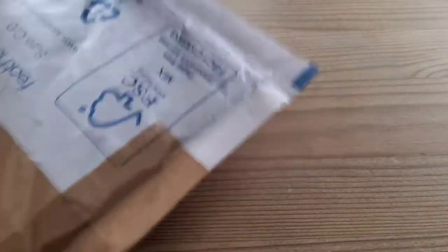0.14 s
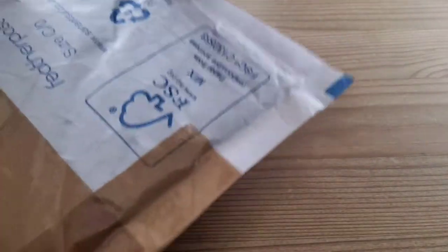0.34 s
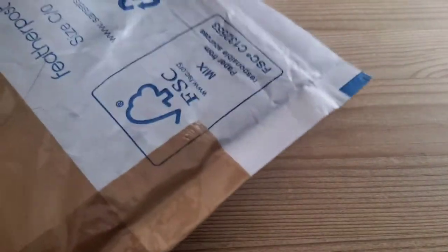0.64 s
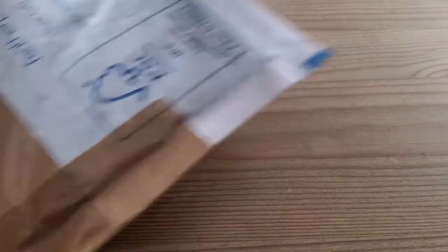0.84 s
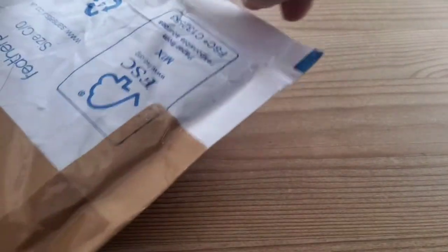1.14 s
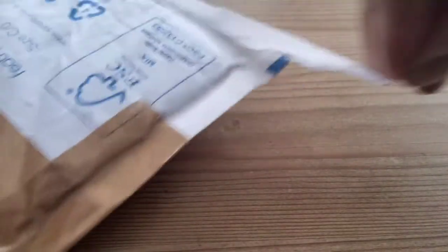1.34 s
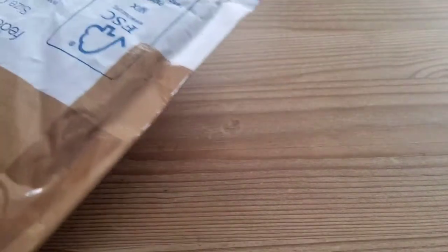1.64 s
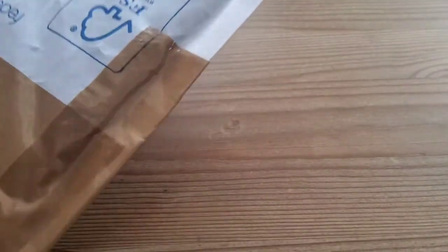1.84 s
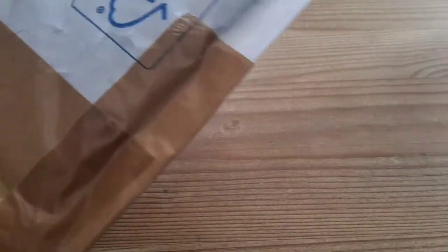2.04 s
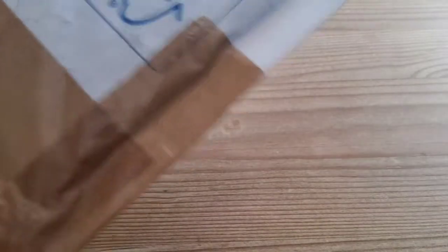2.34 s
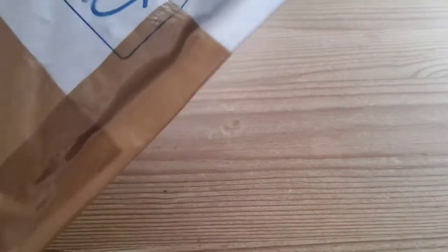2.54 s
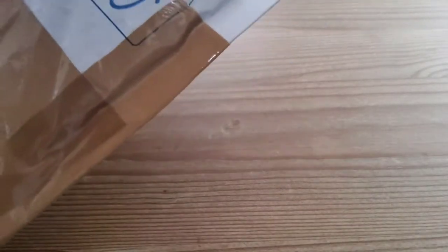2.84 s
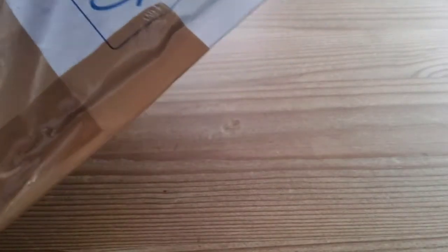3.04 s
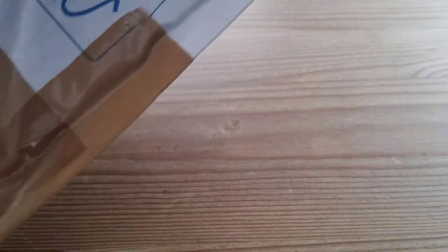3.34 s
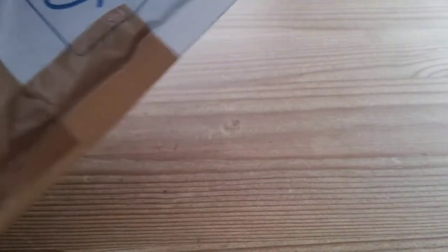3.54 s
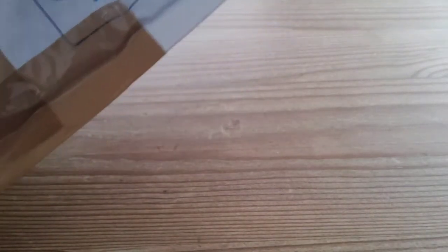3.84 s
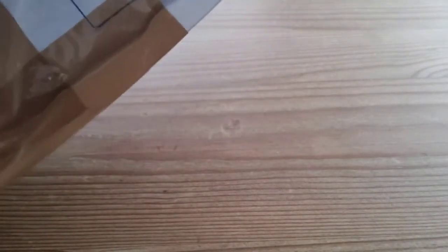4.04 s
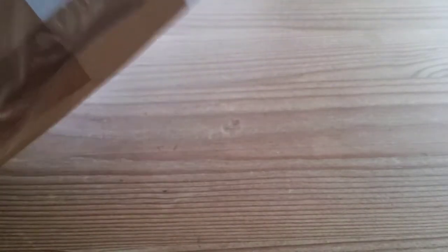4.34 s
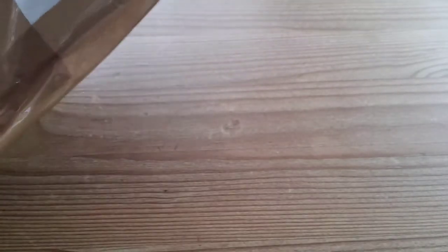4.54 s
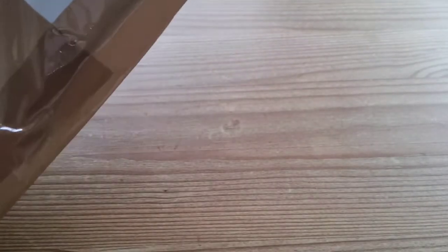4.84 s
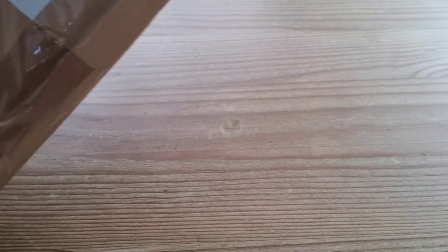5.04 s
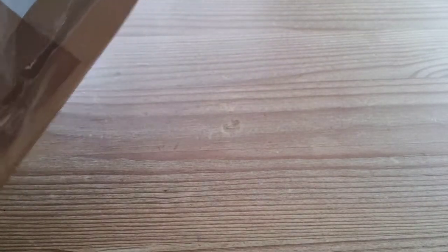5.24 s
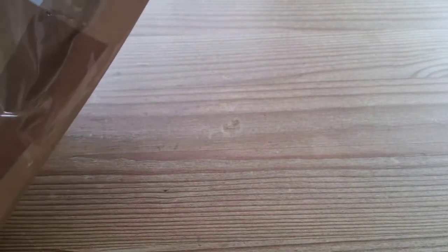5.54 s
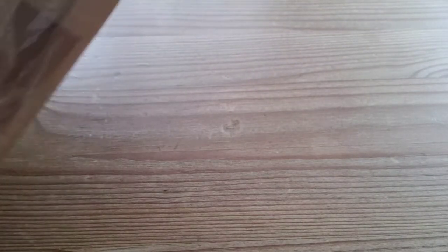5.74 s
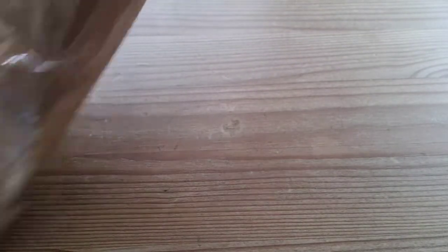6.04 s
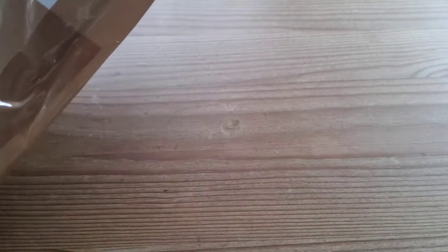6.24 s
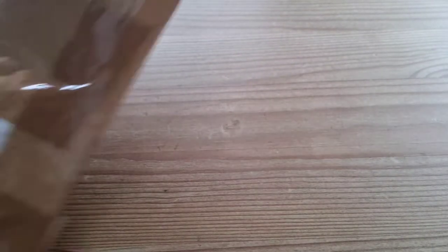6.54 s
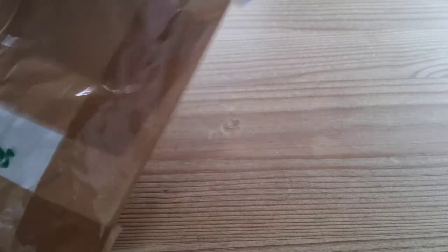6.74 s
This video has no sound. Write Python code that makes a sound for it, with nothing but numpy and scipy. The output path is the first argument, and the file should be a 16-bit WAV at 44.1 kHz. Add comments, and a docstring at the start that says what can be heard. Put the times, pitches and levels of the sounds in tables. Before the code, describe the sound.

A taped paper mailer crinkles and rips close up over a wooden table, with sharp creasing pops, light rubbing and soft bag thumps.

```python
"""A padded, taped paper mailer is gripped, rubbed and torn over a wooden table, close to a phone in a small room.
Hard pulls swell and give way between light slides of the fingers; each is a shower of tiny random slips
that hiss in the fibres and drum on the resonant panels of the bag, while the whole bag flutters.
Creases snap as short pitched pops with cracks of noise, the tape ticks in sprays of treble, the bag thumps
as damped low sines and a grip creaks as narrow ringing noise; faint rumble and hiss lie behind."""
import sys
import numpy as np
from scipy import signal
from scipy.fft import rfft, irfft
from scipy.io import wavfile
from scipy.ndimage import map_coordinates

SR = 44100
rng = np.random.default_rng(int(sys.argv[2]) if len(sys.argv) > 2 else 0)


def to_wav(s):
    """Save 16-bit WAV."""
    ch = np.atleast_2d(s).T  # columns
    pcm = np.round(np.clip(ch, -1, 1) * 32767)  # PCM
    wavfile.write(sys.argv[1], SR, pcm.astype(np.int16))


N = 303849

# All table levels are relative: each layer has its own trim.
# creases buckling: [t/s, pop level/dB, pop f/Hz, crack level/dB]
SNAPS = [(0.0816, -20.5, 1199, -41), (0.31, -28.5, 1540, -32.5), (0.8221, -29, 1140, -28),
         (1.2525, -23, 930, -17), (1.4784, -22, 1140, -23), (1.8523, -36.5, 970, -28.5),
         (2.2562, -32, 1060, -41), (2.3881, -15.5, 840, -29.5), (2.6115, -30, 1005, -39),
         (2.6664, -32, 2300, -39), (2.902, -29.5, 876, -34), (2.9087, -23, 1260, -34),
         (3.006, -21.5, 1350, -24), (3.0189, -17.5, 2620, -34), (3.0854, -21.5, 920, -29),
         (3.4132, -25, 1110, -28), (3.4702, -21.5, 1610, -48), (3.598, -22.5, 740, -42),
         (3.6237, -23, 1910, -51), (3.659, -23.5, 755, -46), (3.735, -25, 1470, -28.5),
         (3.8464, -28.5, 990, -34), (3.8648, -24, 1780, -31), (3.9949, -32, 1880, -45),
         (4.0252, -33.5, 835, -38.5), (4.179, -21, 990, -27), (4.236, -14, 700, -24),
         (4.2807, -13, 1370, -40), (4.3745, -23, 1330, -49), (4.479, -29.5, 1190, -41),
         (4.5706, -22.5, 1820, -35.5), (4.726, -27.5, 1160, -37), (4.925, -26, 1115, -33),
         (4.998, -9.5, 1240, -36), (5.131, -18, 1010, -36.5), (5.1425, -20.5, 1340, -32.5),
         (5.3282, -15.5, 1240, -30), (5.584, -22, 1010, -48), (5.9285, -10, 1310, -16.5),
         (5.9666, -12.5, 742, -19), (5.9737, -9.5, 1010, -34), (5.993, -7.5, 1240, -31),
         (6.575, -35.5, 1440, -51), (6.6671, -22, 2340, -31.5), (6.7875, -29, 2520, -25.5)]


def undb(db):
    """Decibels to gain."""
    return 10 ** (np.asarray(db) / 20)


def unit(x):
    """Scale to rms 1."""
    return x / np.sqrt(np.mean(x ** 2))


def sized(x, db, seconds):
    """Give a short sound the energy of a sine with rms level db held for twice that long."""
    return x * undb(db) * np.sqrt(2 * seconds * SR / np.sum(x ** 2))


def add(out, s, x):
    """Mix a short sound in at time s."""
    i = max(int(s * SR), 0)
    out[:, i:i + x.shape[1]] += x[:, :max(N - i, 0)]


def curves(table):
    """Each column of a table, joined by straight lines in time."""
    s, *columns = np.transpose(table)
    return [np.interp(np.arange(N) / SR, s, c) for c in columns]


def walk(rate):
    """Random points, rate per second, joined by straight lines; the spread is near 1."""
    knots = rng.standard_normal(N // 10)
    return np.interp(np.arange(N) * rate / SR, np.arange(len(knots)), knots)


def convolve(x, kernel):
    """Filter and keep the length."""
    return signal.fftconvolve(x, np.atleast_2d(kernel), axes=1)[:, :x.shape[1]]


def response(points, size=4096):
    """Minimum-phase impulse response of a spectrum, by folding its cepstrum."""
    hz, db = np.transpose(points)
    f = np.maximum(np.arange(size // 2 + 1) * SR / size, 1)
    cepstrum = irfft(np.log(undb(np.interp(np.log(f), np.log(hz), db))))
    cepstrum[1:size // 2] *= 2
    cepstrum[size // 2 + 1:] = 0
    return irfft(np.exp(rfft(cepstrum)))


def colour(x, ring):
    """Filter broadband sound and keep its level."""
    return convolve(x, ring / np.sqrt(np.sum(ring ** 2)))


def resonate(x, hz, width_hz):
    """One resonance, gain 1 at its centre."""
    return signal.lfilter(*signal.iirpeak(hz, hz / width_hz, fs=SR), x)


def lowpass(x, hz):
    """Gentle first-order low-pass."""
    return signal.lfilter(*signal.butter(1, hz, fs=SR), x)


def delay(x, ms):
    """A delay that may move."""
    return map_coordinates(x, [np.arange(N) - ms * SR / 10 ** 3], order=3)


def quiet(level_db=-58):
    """Faint indoor rumble and hiss, mostly shared by the two ports, with a wavering level."""
    # background spectrum: [f/Hz, level/dB]
    quiet_spectrum = [(20, -10.5), (55, 7), (100, -9), (160, -10), (400, -29.5), (900, -23), (1500, -51.5),
                      (16000, -35)]
    shared = rng.standard_normal(N)
    noise = shared + 0.36 * rng.standard_normal((2, N))
    return undb(level_db + 1.7 * walk(21)) * unit(convolve(noise, response(quiet_spectrum)))


def room(x, t60_s=0.34, tail_db=-12, early_db=-14, early_s=0.0024, damp_hz=5000):
    """Quick reflections off the table and bag, then the short tail of the room, as decaying noise."""
    t = np.arange(SR * 2 // 3) / SR
    tail = rng.standard_normal((2, len(t))) * undb(-60 * t / t60_s) * (1 - np.exp(-t / early_s))
    early = rng.standard_normal((2, len(t))) * np.exp(-t / early_s) * (t > .0015)
    echoes = undb(tail_db) * unit(tail) + undb(early_db) * unit(early)
    return convolve(x, lowpass(echoes, damp_hz) / np.sqrt(len(t)))


def close_pair(x, alike_hz=600, alike=0.45):
    """The ports are close together, so long waves reach them more alike: their low difference shrinks."""
    shared = alike * lowpass((x[0] - x[1]) / 2, alike_hz)
    return x - np.array([shared, -shared])


def table_bounce(x, bounce_db=-11, lag_ms=0.3054, wander=0.33, rate=7):
    """The table mirrors the hiss; as the bag moves, the notches that this makes wander."""
    ms = lag_ms * np.exp(wander * walk(rate))
    mirrored = np.array([delay(port, ms) for port in x])
    return (x + undb(bounce_db) * mirrored) / np.hypot(1, undb(bounce_db))


def ports(x, off_centre=1):
    """Sound from the hands reaches the two microphone ports at different times."""
    # where the hands work, at off_centre 1: [t/s, delay of the left port behind the right/ms]
    hand_place = [(2, -0.035), (2.6, 0.28), (4.1, 0.058), (4.3, -0.27)]
    lag_ms = off_centre * curves(hand_place)[0]
    return np.array([delay(x, lag_ms / 2), delay(x, -lag_ms / 2)])


def radiate(power, apart):
    """Random motion of a broad sheet with this power; each port also hears its own part of the sheet."""
    motion = np.sign(rng.standard_normal((3, N))) * np.sqrt(power)
    return (ports(motion[0]) + apart * motion[1:]) / np.hypot(1, apart)


def panels(x):
    """The ring of the bag's paper walls: parallel resonances of alternating sign."""
    # resonances of the panels: [f/Hz, width/Hz, level/dB]
    panel_modes = [(446, 145, -3.5), (647.4, 75, 3), (735, 210, -3), (974, 70, 3), (1267, 230, -11),
                   (1464, 76, -0.5), (2143, 170, -9)]
    return sum((-1) ** k * undb(db) * resonate(x, hz, width) for k, (hz, width, db) in enumerate(panel_modes))


def creaks(width_hz=50, body_hz=230, body_db=-3.0):
    """A short chatter of the grip rings one narrow resonance and shakes the padding under it."""
    # creaks of the grip: [t/s, length/s, level/dB, f/Hz]
    creak_table = [(1.868, 0.085, -52.5, 542), (1.938, 0.097, -52, 500), (2.599, 0.051, -40.5, 510)]
    out = np.zeros((1, N))
    for s, length, db, hz in creak_table:
        chatter = rng.standard_normal(SR // 2)
        ring = unit(resonate(resonate(chatter, hz, width_hz), hz, width_hz))
        body = unit(resonate(resonate(chatter, body_hz, 2 * body_hz), body_hz, 2 * body_hz))
        n = int(length * SR)
        settled = (ring + undb(body_db) * body)[None, -n:]
        add(out, s, undb(db) * unit(settled * np.hanning(n)))
    return ports(out[0])


def thumps(gain_db=0, rattle=1.0, rattle_s=0.0057):
    """The air cushion of the bag takes a bump in a cycle or two while its walls flap."""
    # bumps on hand and table: [t/s, level/dB, f/Hz]
    thump_table = [(1.474, -36, 213), (1.889, -37.5, 145), (2.609, -34, 194), (3.452, -30, 155),
                   (4.236, -20, 297), (4.263, -23, 219), (4.391, -24.5, 198), (5.011, -35, 109),
                   (5.354, -29.5, 118.8), (5.696, -30, 95), (5.974, -28, 290)]
    out, t = np.zeros((1, N)), np.arange(2 ** 12) / SR
    for s, db, hz in thump_table:
        cushion = -np.sin(2 * np.pi * hz * t) * np.exp(-t * hz)
        flap = resonate(rng.standard_normal(len(t)) * np.exp(-t / rattle_s), 2 * hz, 3.5 * hz)
        bump = resonate(unit(cushion) + rattle * unit(flap), hz, 3 * hz)
        add(out, s, sized(bump[None], db + gain_db, .01) / np.sqrt(2))
    return ports(out[0])


def ticks(tick_ms=0.22, low_hz=2500):
    """Stiff tape and single fibres crack without body: each tick is a very short spray of treble."""
    # ticks: [t/s, level/dB]
    tick_table = [(0.737, -46.5), (1.5075, -31), (1.7538, -30), (1.9387, -30), (2.206, -55), (2.379, -31),
                  (2.984, -33), (3.14, -27), (3.1789, -20), (3.276, -25.5), (3.351, -20), (3.6579, -20.5),
                  (4.956, -32)]
    power, ms = np.zeros((1, N)), np.arange(2 ** 9) / SR * 10 ** 3
    burst = ms * np.exp(-ms / tick_ms)
    for s, db in tick_table:
        # start early so that the burst peaks at s
        add(power, s - tick_ms / 10 ** 3, sized(burst[None], db, .002) ** 2 / 2)
    x = radiate(power[0], apart=3.6)
    return x - lowpass(x, low_hz)


def pops(pop_db=-2.0, pop_cycles=0.25, ring_db=-8.5, upper=2.3, upper_db=-6, apart=0.65):
    """A crease flips: a push of air with a higher overtone dies within two cycles, and the panels ring."""
    out, t = np.zeros((2, N)), np.arange(2 ** 11) / SR
    for s, db, hz, _ in SNAPS:
        fold = t ** 2 * np.exp(-t * hz / pop_cycles)
        phase = 2 * np.pi * hz * t
        wave = fold * (np.exp(1j * phase) + undb(upper_db) * np.exp(1j * upper * phase))
        push = unit(wave.imag)
        body = push + undb(ring_db) * unit(panels(push))
        # each crease faces its own way, so one port leads
        side = apart * rng.choice([-1, 1]) * unit(wave.real)
        add(out, s, sized(np.array([body, side]), db + pop_db, .002) / np.sqrt(2))
    return ports(out[0], off_centre=0.57) + np.array([out[1], -out[1]])


def snap_tails(ring_db=-17, fade_ms=7, rate=500):
    """After a crease flips, its neighbours settle in a few small drumming ticks."""
    out, ms = np.zeros((1, N)), np.arange(2 ** 11) / SR * 10 ** 3
    fade = np.sqrt(ms[None]) * np.exp(-ms / fade_ms)
    for s, db, _, _ in SNAPS:
        add(out, s, sized(fade, db + ring_db, .002) ** 2 / 2)
    settling = out[0] * slips(rate, 1.8, 0.41)
    return colour(radiate(settling, apart=0.95), panels(signal.unit_impulse(2 ** 11)))


def cracks(crack_db=2, crack_ms=.5, after_db=-21, after_ms=9):
    """Power of the fibres along each crease: they crack as it flips, then settle."""
    out, ms = np.zeros((1, N)), np.arange(2 ** 10) / SR * 10 ** 3
    burst = ms / crack_ms * np.exp(-ms / crack_ms) + undb(after_db) * np.exp(-ms / after_ms)
    for s, _, _, db in SNAPS:
        add(out, s, sized(burst[None], db + crack_db, .002) ** 2 / 2)
    return out[0]


def strokes(t):
    """Movements as (power envelope, hiss dB, rustle dB, lift dB, wrinkles): pulls give way, slides run on."""
    # hard pulls that rip or scrape the paper, lift coming from tautness:
    # [peak t/s, build-up/s, fade/s, fibre hiss level/dB, panel rustle level/dB, treble lift/dB]
    pull_table = [(0.147, 0.079, 0.047, -21, -33, 2.5), (0.888, 0.071, 0.15, -27, -37, 5),
                  (1.085, 0.018, 0.047, -26, -42, 2), (1.28, 0.036, 0.075, -21, -32.5, 4.5),
                  (1.467, 0.078, 0.057, -30, -38.5, 1.5), (3.441, 0.13, 0.041, -35.5, -37, 2),
                  (4.15, 0.061, 0.029, -26.5, -37, 14), (4.195, 0.055, 0.039, -22, -22, 0),
                  (4.244, 0.083, 0.057, -25, -28, 0.5), (5.375, 0.031, 0.018, -36, -42, -9.5),
                  (5.44, 0.073, 0.1, -25.5, -40.5, 2.5), (5.573, 0.059, 0.035, -31, -34.5, 3.5),
                  (5.932, 0.046, 0.099, -22.5, -24.5, 4.5), (5.975, 0.063, 0.042, -24.5, -18.5, -6),
                  (6.676, 0.043, 0.048, -39.5, -39, -4.5), (6.8, 0.019, 0.038, -33.5, -37, -5.5)]
    # fingers sliding on the bag: [start t/s, length/s, fibre hiss level/dB, panel rustle level/dB,
    # treble lift/dB, swell over the slide/dB]
    slide_table = [(0, 0.49, -60.5, -54, -5.5, -17), (0.427, 0.21, -51, -57.5, -6, 4.5),
                   (1.016, 0.25, -44.5, -52, 9, 21.5), (1.518, 0.26, -59.5, -72, 18.5, 22.5),
                   (1.816, 0.14, -46, -55, 3, 4), (2.263, 0.067, -44.5, -56, 4, -6),
                   (2.364, 0.11, -49, -47, -4, 7.5), (2.512, 0.28, -55.5, -55, -2.5, 1.5),
                   (2.838, 0.14, -51, -52, -5, 12), (3.034, 0.43, -39, -49, 0.5, 0),
                   (3.547, 0.23, -42, -47, 1.5, 4.5), (3.822, 0.32, -57, -55.5, -1.5, -16),
                   (4.379, 0.25, -48.5, -50, -4.5, -14), (4.658, 0.15, -46, -53.5, -3, -4.5),
                   (4.862, 0.68, -47, -49.5, -3, -3), (5.626, 0.21, -46, -46.5, -1.5, 8),
                   (6.081, 0.16, -42, -51.5, -2.5, 7), (6.285, 0.25, -60, -63, -4.5, -12.5),
                   (6.572, 0.3, -53, -52.5, -5.5, 3.5)]
    drop_db, roundness = 15, 1.64  # fall over one build-up or fade time; 1 is a pointed top, 2 a bell
    attack_s, release_s = .006, .024  # time constants with which a slide starts and stops
    # power share of single wrinkles that tick: fast sliding merges nearly all the slips
    pull_wrinkles, slide_wrinkles = 0.1, 0.4
    for s, build, fade, *levels in pull_table:
        away = np.maximum((s - t) / build, (t - s) / fade)
        envelope = undb(-drop_db * np.minimum(away, 10) ** roundness)
        yield (envelope ** 2, *levels, pull_wrinkles)
    for s, length, *levels, swell_db in slide_table:
        outside = np.maximum((s - t) / attack_s, (t - s - length) / release_s)
        along = np.clip((t - s) / length, 0, 1)
        envelope = np.exp(-np.clip(outside, 0, 20)) * undb(swell_db * (along - .5))
        yield (envelope ** 2, *levels, slide_wrinkles)


def hands():
    """Hiss dB, rustle dB, treble lift dB and wrinkle share of all movements; hiss power weights the last two."""
    t = np.arange(0, N, 2 ** 5) / SR
    hiss = drum = lift = share = 0
    for power, hiss_db, rustle_db, lift_db, wrinkles in strokes(t):
        own = power * undb(hiss_db) ** 2
        hiss = hiss + own
        drum = drum + power * undb(rustle_db) ** 2
        lift = lift + own * lift_db
        share = share + own * wrinkles
    levels = [10 * np.log10(hiss), 10 * np.log10(drum)]
    return curves(np.transpose([t, *levels, lift / hiss, np.clip(share / hiss, 0, 1)]))


def flutter(hiss_db, rustle_db, base_db=-20, by_hiss=0.14, by_rustle=0.51):
    """The whole padded bag shakes in the hands, the more the harder it is rubbed."""
    # spectrum of the shaking bag: [f/Hz, level/dB]
    flutter_spectrum = [(25, -33), (45, 0), (65, 1.5), (160, -1.5), (250, -5.5), (400, -11), (900, -62.5)]
    db = base_db + by_hiss * hiss_db + by_rustle * rustle_db
    return colour(radiate(undb(db) ** 2, apart=0.7), response(flutter_spectrum))


def slips(rate, spread_db, ring_ms):
    """Power of a shower of stick-slip grains of unequal size, rate per second, mean 1."""
    size = undb(2 * spread_db * np.minimum(rng.exponential(size=N), 4))
    grains = (rng.random(N) < rate / SR) * size
    power = signal.lfilter([1], [1, -np.exp(-2 * 10 ** 3 / (ring_ms * SR))], grains)
    return power / power.mean()


def friction(db, rate, spread_db, ring_ms, share, wrinkle_rate=60):
    """Power of rubbed paper: merged slips, with a share of single wrinkles ticking."""
    wrinkles = slips(wrinkle_rate, spread_db=2.7, ring_ms=1.1)
    return undb(db) ** 2 * ((1 - share) * slips(rate, spread_db, ring_ms) + share * wrinkles)


def rustle(rustle_db, wrinkles, catch, gain_db=0):
    """Coarser slips drum on the walls of the bag."""
    power = friction(rustle_db + gain_db, 1500, 8.0, 0.21, wrinkles) * catch ** 2
    return colour(radiate(power, apart=0.71), panels(signal.unit_impulse(2 ** 11)))


def fingertips(hiss_db, catch, air_db=-25, growth=0.62, cutoff_hz=11000):
    """Skin on paper gives a thin, airy hiss even at a light touch; it grows more slowly than the tearing."""
    x = radiate((undb(air_db + growth * hiss_db) * catch) ** 2, apart=2)
    return signal.lfilter(*signal.butter(2, cutoff_hz, "highpass", fs=SR), x)


def flex(x, shift_db=3.5, rate=45):
    """The bending sheet radiates each octave of its hiss a little differently from moment to moment."""
    out = 0
    for hz in 1500 * 2. ** np.arange(4):
        # peel off the band below hz and pass the rest on
        low = signal.sosfiltfilt(signal.butter(3, hz, fs=SR, output="sos"), x)
        out = out + low * undb(shift_db * walk(rate))
        x = x - low
    return out + x * undb(shift_db * walk(rate))


def fibres(hiss_db, lift_db, wrinkles, catch, gain_db=1, split_hz=6000):
    """Showers of fibre slips and the cracks of the creases, brighter when the paper is taut."""
    # spectrum of slipping fibres: [f/Hz, level/dB]
    fibre_spectrum = [(500, -9.5), (1200, 2.5), (1900, 1.5), (3500, 2.5), (7000, 0.5), (11500, -2),
                      (13000, -5.5), (16000, -10.5)]
    power = friction(hiss_db + gain_db, 6000, 2.8, 0.93, wrinkles) * catch ** 2
    x = colour(radiate(power + cracks(), apart=3.0), response(fibre_spectrum))
    low = lowpass(x, split_hz)
    # the lift takes more from the lows than it gives the treble
    return low * undb(-lift_db) + (x - low) * undb(lift_db * 0.43)


def scene():
    """The mailer, its room and the quiet behind it."""
    hiss_db, rustle_db, lift_db, wrinkles = hands()
    catch = undb(1.32 * walk(190))  # the paper catches and lets go
    hiss = table_bounce(flex(fibres(hiss_db, lift_db, wrinkles, catch)))
    rubbing = hiss + rustle(rustle_db, wrinkles, catch) + flutter(hiss_db, rustle_db)
    creases = pops() + snap_tails()
    handling = ticks() + thumps() + creaks()
    mailer = rubbing + creases + handling + fingertips(hiss_db, catch)
    return close_pair(mailer + room(mailer)) + quiet()


def record(dry, top_hz=16300):
    """The phone stops at full scale and cuts the top."""
    clipped = np.clip(dry, -1, 1)
    return signal.sosfilt(signal.ellip(10, .2, 80, top_hz, fs=SR, output="sos"), clipped)


dry = scene()
out = record(dry)
to_wav(out)
```